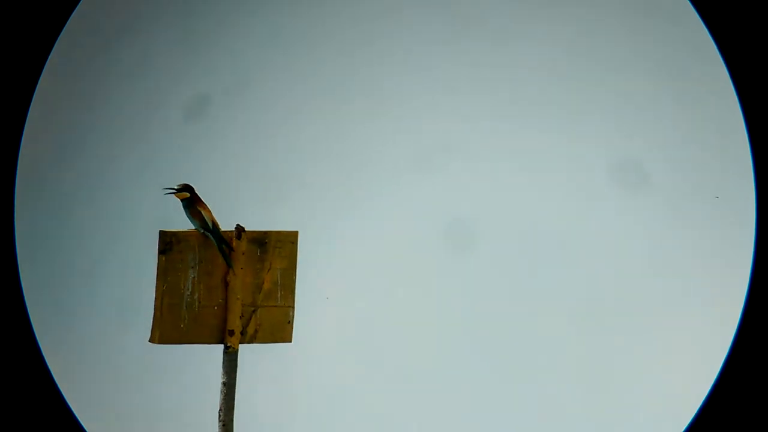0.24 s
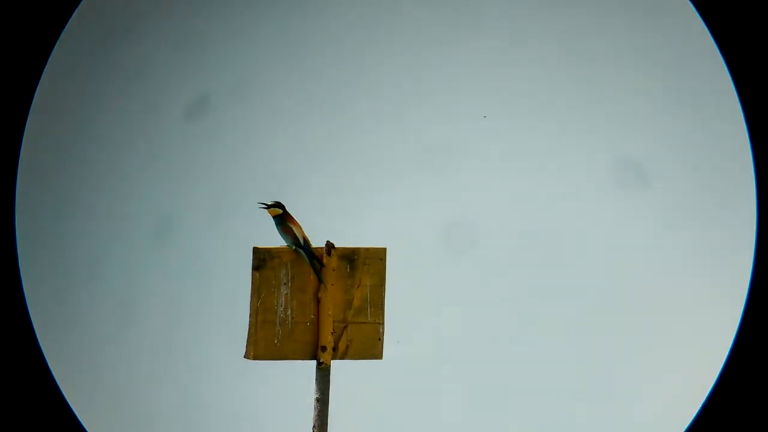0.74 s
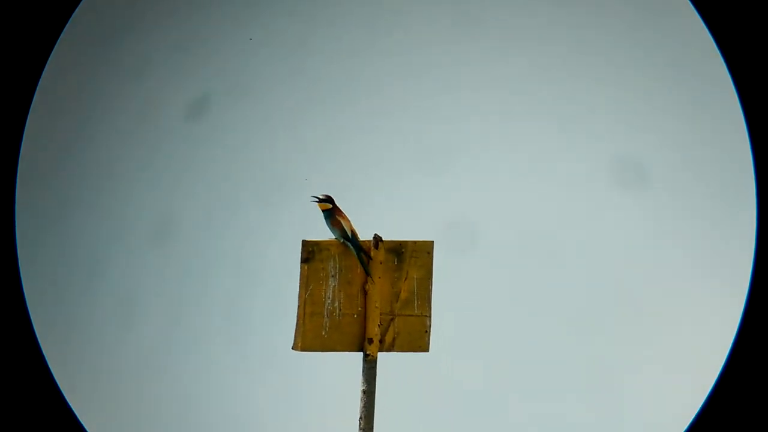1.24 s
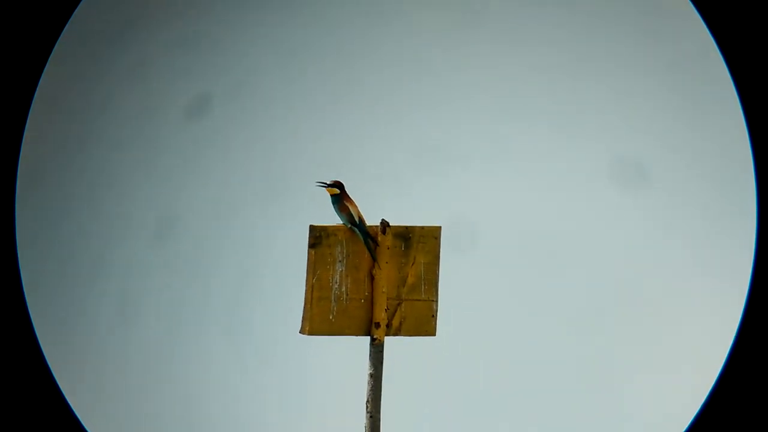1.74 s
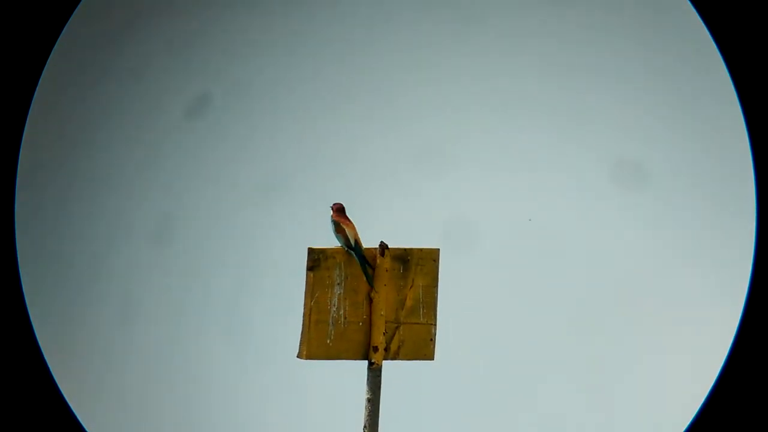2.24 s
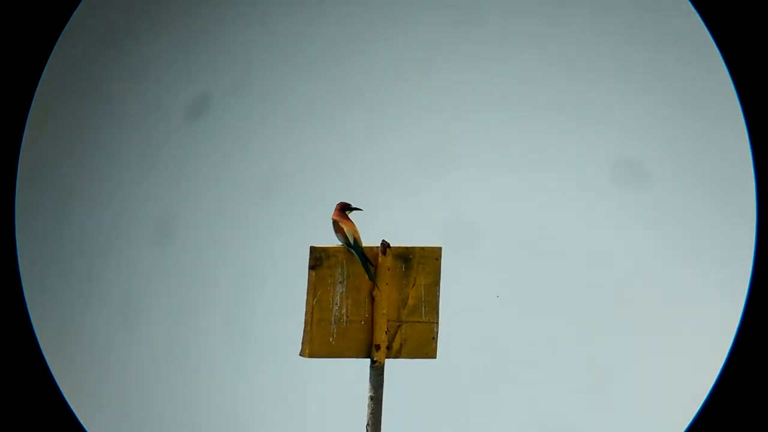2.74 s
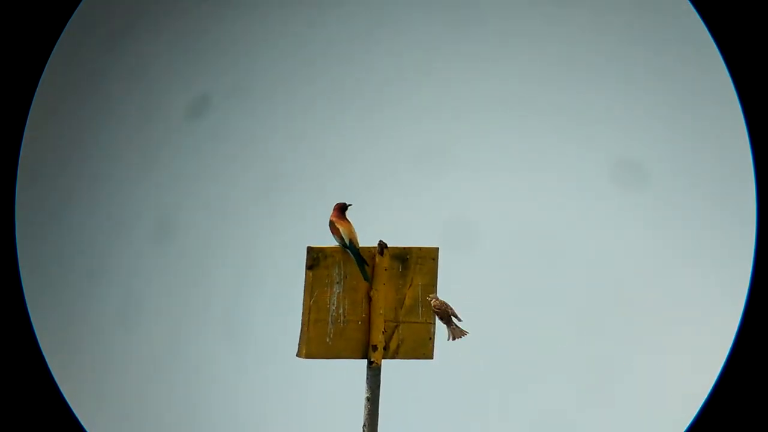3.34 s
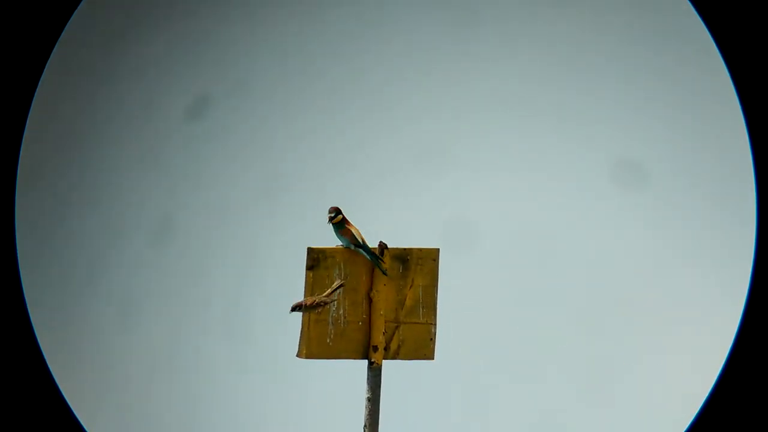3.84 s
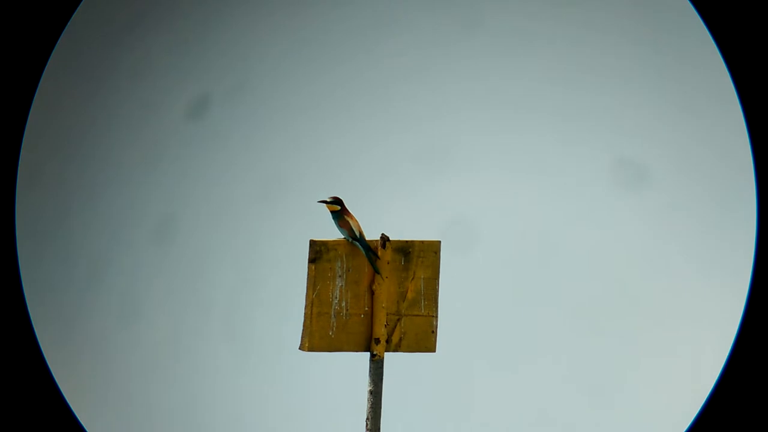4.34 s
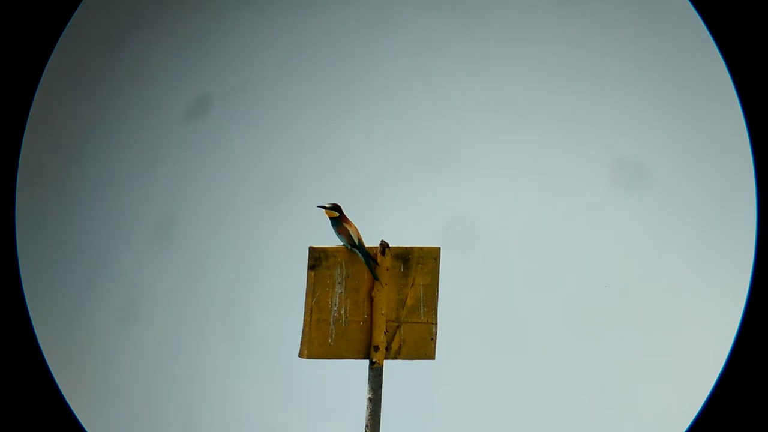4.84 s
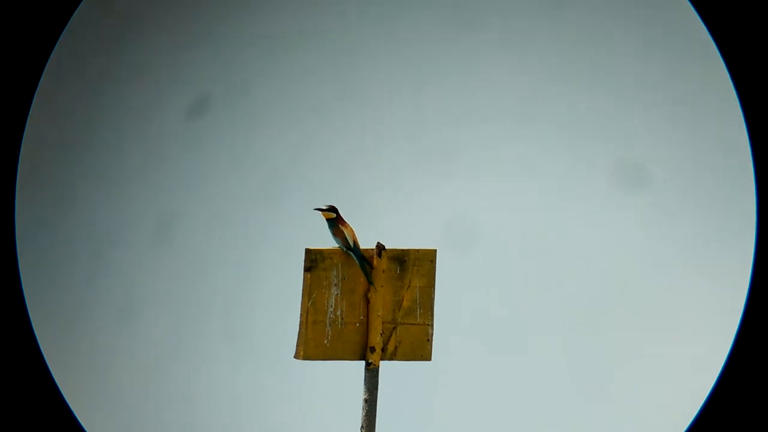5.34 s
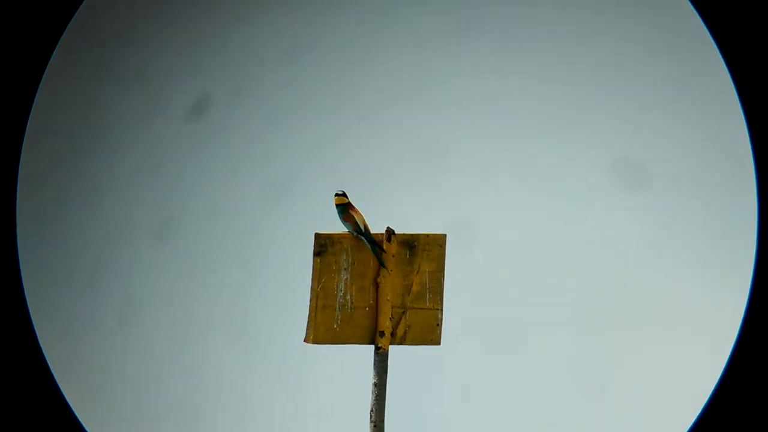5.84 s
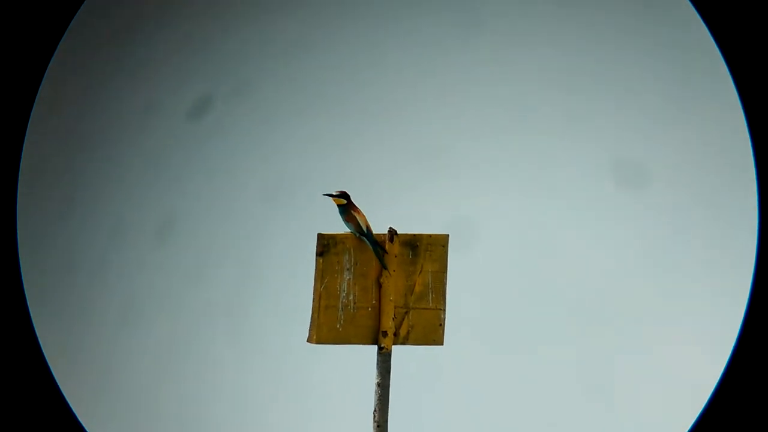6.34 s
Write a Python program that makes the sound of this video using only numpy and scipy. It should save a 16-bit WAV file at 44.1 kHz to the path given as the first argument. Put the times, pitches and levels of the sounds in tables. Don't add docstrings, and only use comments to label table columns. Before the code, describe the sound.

A small bird chirps short, bright, rasping notes in an open field while a distant one trills; handling knocks bump, one very loud near five seconds.

```python
import sys
import numpy as np
from scipy import signal
from scipy.io import wavfile
from scipy.ndimage import uniform_filter1d

SR = 44100
rng = np.random.default_rng(int(sys.argv[2]) if len(sys.argv) > 2 else 0)


def convert_level_to_amplitude(level_db):
    exponent = np.asarray(level_db, float) / 20
    return 10 ** exponent


def output_pcm(signal):
    pcm = np.clip(np.atleast_2d(signal).T, -1, 1) * 32767
    wavfile.write(sys.argv[1], SR, np.round(pcm).astype(np.int16))


N = 291114

# time in seconds, level in dB.
BREEZE = [
    (0, -68.5),
    (.9, -69),
    (1.9, -66.5),
    (2.8, -68),
    (4.1, -69),
    (5.2, -67.5),
    (6.0, -68),
    (6.6, -68),
]
# start and end in seconds, level in dB, left over right in dB.
GUSTS = [(.0, 0.31, -70, 6), (.38, 0.564, -64, 11), (0.599, 0.716, -67.5, -2), (0.835, 1.109, -67, 9),
         (1.185, 1.557, -70, 12), (1.632, 1.931, -62, 16), (2.447, 2.65, -65.5, 8), (2.731, 2.887, -61, 2),
         (2.905, 3.243, -59, 0), (3.216, 3.593, -60.5, -3), (3.604, 3.761, -65.5, 16),
         (3.985, 4.302, -60.5, -2.5), (4.694, 4.849, -69, 0), (5.059, 5.242, -59, 16),
         (5.276, 5.425, -61.5, 6), (5.5, 5.67, -61, 11), (5.848, 6.13, -60, 12.5)]
# start in seconds, level in dB, pitch in Hz, left over right in dB.
BUFFETS = [
    (2.785, -50, 65, -6),
    (2.852, -50, 60, -6),
    (2.953, -44, 60, -8),
    (3.108, -47, 60, -5),
    (3.166, -47, 65, -5),
    (3.247, -48, 55, -5),
    (3.476, -46, 48, -5),
    (3.507, -43, 65, -5),
]
CALM_DB, CALM_FOLLOWS, CALM_PAN_DB = -68.5, 1.5, 9

# pitch in Hz, level in dB per Hz.
HISS_SHAPE = [(75, -7.5), (199, -12.5), (800, -21), (2060, -23.5), (3580, -25.5), (4420, -22.5),
              (5310, -29), (16000, -31)]
HISS_DB, TREBLE_FOLLOWS, MIDDLE_FOLLOWS = -38, 0.81, 0.85

# start and end in seconds, level in dB.
GRIPS = [
    (.40, .6, -69),
    (.85, 1.45, -73.5),
    (1.45, 2.15, -75),
    (3.6, 4.2, -75.5),
    (4.25, 4.45, -67.5),
    (4.95, 5.2, -61.5),
    (5.22, 5.36, -50),
    (5.385, 5.47, -54),
    (5.5, 5.64, -59.5),
    (5.86, 6.3, -71),
]
RESTING_DB = -77.5

# start and end in seconds after the call starts, first and last pitch in Hz, level in dB.
HOOK = [
    (.008, .021, 3917, 5000, -9),
    (.020, .034, 5000, 5330, -0.5),
    (.034, .044, 4590, 3940, 0.5),
    (.044, .051, 4300, 4850, -6),
    (.051, .060, 4800, 4050, -7),
    (.061, .080, 3900, 4260, -4),
    (.082, .091, 3590, 3000, -15.5),
]
SLIDE = [
    (.014, .019, 4150, 4600, -6),
    (.019, .026, 4550, 4750, -1),
    (.025, .031, 4800, 5300, -6),
    (.031, .038, 4990, 4050, -6),
    (.040, .049, 4450, 3950, -4),
    (.049, .066, 4600, 3950, -1),
    (.068, .081, 3400, 3240, -12),
    (.086, .104, 3700, 4400, -7),
]
ARCH = [
    (.012, .023, 3960, 5500, -7),
    (.023, .029, 5540, 5290, -6),
    (.029, .039, 4940, 3900, -5.5),
    (.042, .068, 4350, 3940, -1.5),
    (.069, .081, 3000, 3450, -7),
    (.080, .089, 3450, 4150, -7),
]
# start in seconds, peak level in dB, pitch factor, left over right in dB.
HOOKS = [
    (0.029, -51, 0.982, -5.5),
    (0.936, -48, 0.993, -3.46),
    (1.2312, -48, 1.016, -2.9),
    (1.9234, -48, 1.02, -4.5),
    (2.8193, -54, 1.013, -2.5),
    (3.296, -54, 0.995, -3),
    (3.9797, -53.5, 1.006, -5),
    (4.6906, -51.5, 0.99, -3.5),
    (5.4942, -53, 1.016, -1.5),
]
SLIDES = [
    (0.386, -50, 1.0, -5.5),
    (0.7323, -50, 0.97, -8.5),
    (1.446, -48, 0.98, -4),
]
ARCHES = [
    (1.842, -44, 1.01, -6.5),
    (2.729, -51, 0.99, -3),
    (3.609, -52.5, 0.982, -1.5),
]
NOTE_EDGE_S = 0.0021
RASP_HZ, RASP_DEPTH, RASP_SWING = 210, .45, .017
ECHO_S, ECHO_DB = .014, -12

# start and end in seconds, first pitch in Hz, notes per second, level in dB.
EVEN_TRILLS = [
    (.61, .73, 4550, 60, -64),
    (1.558, 1.70, 3780, 58, -56.5),
    (2.026, 2.21, 4430, 59.5, -53.5),
    (3.229, 3.315, 4680, 59, -58),
    (3.3705, 3.52, 4390, 60, -51.5),
]
CLIMBING_TRILLS = [
    (2.52, 2.555, 2950, 70, -51),
    (4.989, 5.18, 3400, 47, -53),
]
RUN_UP = [
    (2.633, 2.765, 2920, 91, -48.5),
]
PIPS = [
    (4.5335, 4.812, 4750, 32.3, -50.5),
]
RUN_DOWN = [
    (3.005, 3.11, 3000, 96, -56),
]
# its phrases, drift in Hz per second, length of a note as a spread in seconds,
# fall within a note in Hz per second, cup (rise in Hz at 5 ms from the middle of a note).
TRILL_KINDS = [
    (EVEN_TRILLS, -500, .005, 4000, 230),
    (CLIMBING_TRILLS, 700, .0045, 25000, 0),
    (RUN_UP, 6300, .0011, 200000, 0),
    (RUN_DOWN, -4500, .002, 50000, 0),
    (PIPS, 0, .0016, 130000, 0),
    ([(3.70, 3.976, 4230, 53, -60.5)], -250, .0044, 6000, 0),
]
# start and end in seconds, first and last pitch in Hz, level in dB.
SLURS = [(0.12, 0.142, 3685, 4400, -60.5), (0.15, .168, 3800, 4400, -60), (.168, .185, 3900, 4550, -58),
         (.19, .205, 4150, 4300, -62), (.21, 0.24, 4230, 4260, -61), (0.236, 0.274, 4250, 3870, -62.5),
         (2.501, 2.517, 4840, 3550, -52), (3.11, 3.133, 3900, 4200, -59.5), (3.139, 3.146, 4250, 3850, -57),
         (3.152, 3.163, 3600, 3350, -57), (3.538, 3.55, 4000, 3600, -57), (2.918, 2.932, 4900, 4600, -60),
         (4.874, 4.896, 4770, 4200, -59), (4.919, 4.941, 4400, 4100, -57),
         (1.612, 1.624, 7000, 6880, -61.5), (0.937, 0.95, 5640, 6200, -56), (1.03, 1.066, 5130, 5300, -66),
         (1.096, 1.108, 5980, 6440, -64.5), (1.159, 1.177, 4000, 4230, -57),
         (1.196, 1.231, 3850, 5200, -60), (1.232, 1.246, 5700, 5900, -58), (1.741, 1.756, 5600, 5920, -57),
         (1.741, 1.759, 3500, 3790, -60.5), (2.0, 2.018, 5400, 5550, -60), (2.018, 2.05, 5300, 4800, -64),
         (2.052, 2.066, 3750, 3450, -63), (2.095, 2.11, 2950, 3050, -63), (1.8, 1.813, 4050, 3850, -60),
         (1.826, 1.832, 3600, 3300, -60), (1.836, 1.845, 3050, 3300, -59), (1.945, 1.957, 7500, 7300, -63),
         (2.007, 2.017, 3350, 3150, -57), (2.495, 2.503, 3700, 3900, -57), (4.135, 4.142, 4100, 3700, -57),
         (4.154, 4.161, 3400, 3050, -59), (6.508, 6.522, 3500, 4050, -62), (1.03, 1.036, 5300, 4950, -57),
         (1.064, 1.071, 5200, 4800, -56), (3.972, 4.012, 4170, 3750, -57), (4.242, 4.275, 5900, 5280, -64),
         (4.297, 4.32, 3930, 4124, -61.5)]
MORE_SLURS = [
    (1.11, 1.152, 5650, 5400, -57),
    (1.118, 1.136, 4600, 5200, -55.5),
    (1.372, 1.4, 5800, 4780, -56),
    (3.503, 3.522, 4900, 4820, -58),
    (3.52, 3.535, 4820, 4350, -55),
    (6.14, 6.2, 4500, 4400, -67),
    (6.196, 6.246, 4350, 3980, -65),
    (4.948, 4.958, 3600, 3400, -58),
]
FAR_WHISTLE = [
    (5.75, 5.77, 2480, 2500, -70),
    (5.775, 5.815, 2600, 2620, -69.5),
    (5.822, 5.885, 2690, 2650, -68),
    (5.905, 5.922, 2750, 2760, -65),
    (5.937, 5.958, 2830, 2780, -64),
    (6.0, 6.045, 2640, 2600, -73),
]
WARBLE = [
    (2.212, 2.45, 4230, 3950, -53.5),
]
SWINGS_PER_S = 24
LARK_PAN_DB, LARK_LAG_S = -11, 4 / SR
LARK_SHIMMER_DB, LARK_SCATTER_DB = 1.0, -16
FIELD_T60_S, SCATTER_DB = 0.12, -4

# start in seconds, level in dB, pitch in Hz, push +1 or pull -1.
KNOCKS = [(.438, -45.5, 402, 1), (.535, -48, 309, 1), (1.215, -44.5, 466, 1), (1.262, -44, 436, -1),
          (1.386, -49, 297, 1), (1.616, -44, 307.5, 1), (2.039, -45, 192.1, 1), (3.139, -44.5, 184.7, 1),
          (4.067, -42, 182, -1), (4.331, -48, 168, 1), (5.008, -43.5, 302, 1), (5.388, -39, 300, 1),
          (5.526, -37.5, 227, -1), (5.887, -40, 229, 1), (5.937, -36.5, 170, -1), (1.212, -45, 200, -1),
          (1.296, -46, 190, 1), (1.299, -44, 140, -1), (5.272, -40, 480, 1), (5.306, -42, 330, -1),
          (5.324, -41, 400, -1), (5.395, -41, 290, -1), (5.403, -43, 330, 1), (5.538, -39, 200, -1),
          (5.561, -43, 200, -1), (5.578, -45, 250, -1), (5.912, -43, 330, 1), (6.012, -48, 330, 1),
          (6.042, -44, 350, -1)]
SWELL_CYCLES = 0.383
# start in seconds, level in dB, pitch in Hz, swell in cycles, push +1 or pull -1.
BLOWS = [(.8743, -35, 187, .19, 1), (1.4892, -36.5, 251, .65, -1), (1.4893, -38.5, 141, .17, 1),
         (1.788, -30, 402, .29, 1), (1.7904, -36, 359, 1.07, -1), (1.7916, -27, 182, .41, -1),
         (1.8624, -26, 164, .32, 1), (1.8633, -16, 510, .37, -1), (1.8637, -28.5, 229, .73, 1),
         (5.1208, -13.6, 270, .19, -1), (5.1216, -.8, 405, .22, 1), (5.1259, -17, 269, .3, 1),
         (5.1338, -22.5, 227, .18, -1), (6.0563, -32, 203, .27, 1), (6.0583, -27.5, 361, .49, 1),
         (6.072, -36, 295, .45, 1), (6.0722, -32, 406, .85, -1), (5.05, -40, 384, 0.686, 1),
         (5.1395, -27, 450, .6, 1), (5.146, -29, 480, .5, 1), (5.9266, -38, 273, 1.06, 1),
         (5.926, -42, 142, .73, -1)]
# start in seconds, level in dB.
TICKS = [
    (1.7885, -33),
    (1.8647, -31),
    (5.1218, -16),
    (5.131, -26),
    (5.885, -61),
    (6.058, -57),
    (6.073, -55.5),
]
# pitch in Hz, level in dB, time to fade by 60 dB in seconds.
TICK_MODES = [(2070, -2.5, 0.0042), (3500, -4.5, 0.0034), (4400, -0.5, 0.0028), (5500, 6, 0.0017),
              (7000, -13, 0.005), (10000, -8.5, 0.0036), (12620, -15, .004)]
# start in seconds, level in dB, pitch in Hz, time to fade by 60 dB in seconds.
PINGS = [
    (1.7885, -28.5, 4330, 0.014),
    (5.1308, -25, 4400, .017),
    (1.7884, -42, 12500, .005),
    (1.7885, -39, 10300, .004),
    (1.8645, -39, 10400, .004),
    (1.788, -42, 1850, .008),
    (1.8646, -36, 2500, .004),
    (.404, -39, 566, 0.041),
    (1.293, -41, 550, .09),
]
HOUSING_CUT_HZ = 950
# start and end in seconds, lowest and highest Hz, level in dB.
STRAINS = [
    (1.755, 1.79, 4200, 4600, -45),
    (1.74, 1.79, 11800, 13200, -63),
    (1.75, 1.79, 9300, 10800, -66),
    (1.76, 1.79, 6400, 7400, -64),
    (5.07, 5.122, 4200, 4700, -53),
]

# start and end in seconds, lowest and highest Hz, level in dB.
SCRAPES = [
    (5.13, 5.16, 1510, 7100, -50.5),
    (5.131, 5.18, 203, 880, -43.5),
    (5.262, 5.302, 1490, 7730, -59.5),
    (5.462, 5.467, 1000, 5920, -60),
    (5.89, 5.974, 202, 620, -54),
]
CHATTER = [(5.882, 5.963, 2010, 4000, -63.5), (5.885, 5.96, 4000, 8000, -69),
           (6.043, 6.078, 1130, 4000, -64.5), (6.19, 6.39, 9300, 10800, -74.5),
           (6.2, 6.42, 10600, 13200, -79), (6.197, 6.4, 4640, 6900, -76), (5.97, 6.24, 4650, 5300, -72),
           (6.17, 6.36, 4550, 5200, -71.5), (6.28, 6.5, 4500, 5200, -72), (6.42, 6.6, 4800, 5400, -70),
           (0.916, 1.44, 4400, 5830, -74)]
SCRAPE_PAN_DB, CHATTER_PAN_DB = 21, -3.5

# start of sinking and moment of opening, in seconds.
GATE = [
    (-.25, .035),
    (.2, .395),
    (.68, .87),
    (2.05, 2.478),
    (2.4, 2.745),
    (3.72, 3.99),
    (4.25, 4.70),
    (4.68, 5.0),
    (5.64, 5.875),
    (6.28, 6.7),
]
SINK_DB_PER_S, OPEN_S = 14.5, 0.014


def rms_one(x):
    return x / np.sqrt(np.mean(x ** 2) + 1e-20)


def in_time(rows):
    s, *columns = np.transpose(rows)
    return [np.interp(np.arange(N) / SR, s, c) for c in columns]


def drift(rate):
    r = np.exp(-2 * np.pi * rate * 40 / SR)
    slow = signal.lfilter([1], [1, -2 * r, r * r], rng.standard_normal(N // 40 + 2002))[2000:]
    return np.interp(np.arange(N) / 40, np.arange(len(slow)), rms_one(slow))


def band(x, low_hz, high_hz, order=2):
    return signal.sosfilt(signal.butter(order, [low_hz, high_hz], "band", fs=SR, output="sos"), x)


def ring(clicks, hz, t60):
    r, w = convert_level_to_amplitude(-60 / (t60 * SR)), 2 * np.pi * hz / SR
    return signal.lfilter([0, np.sin(w)], [1, -2 * r * np.cos(w), r * r], clicks + 1e-18)


def add(out, start, sound, pan_db, lag=0.):
    for channel, at in enumerate((start, start + lag)):
        i = round(at * SR)
        out[channel, i:i + len(sound)] += sound[:N - i] * convert_level_to_amplitude(pan_db * (1.5 - channel))


def whistle(hz, gain):
    return gain * np.sin(2 * np.pi * np.cumsum(hz) / SR)


def fade(t, length, edge):
    return np.clip(np.minimum(t, length - t) / edge, 0, 1)


def swells(rows, edge):
    t = np.arange(N) / SR
    return [convert_level_to_amplitude(level_db) * fade(t - start, end - start, edge * (end - start))
            for start, end, level_db, *_ in rows]


def breeze():
    level_db, = in_time(BREEZE)
    return level_db - level_db.mean()


def wind():
    side = np.array([[.4], [-.4]])
    force = convert_level_to_amplitude(CALM_DB + CALM_FOLLOWS * breeze() + CALM_PAN_DB * side)
    for gust, (*_, pan_db) in zip(swells(GUSTS, edge=0.205), GUSTS):
        force = force + gust * convert_level_to_amplitude(pan_db * side)
    lumps = convert_level_to_amplitude(np.stack([2.6 * drift(21), 2.2 * drift(6.48)]))
    own, shared = rng.standard_normal((2, N)), rng.standard_normal(N)
    rumble = rms_one(band(own + 0.62 * shared, 31.8, 92) * lumps)
    hum = rms_one(band(rng.standard_normal(N), 58, 61))
    out = rumble * force * convert_level_to_amplitude([[-.4], [1.4]]) + convert_level_to_amplitude(-69.5) * hum
    for start, level_db, hz, pan_db in BUFFETS:
        t = np.arange(0, 1.5 / hz, 1 / SR)
        bulge = np.sin(np.pi * t * hz / 1.5) ** 2
        add(out, start, whistle(hz + 0 * t, convert_level_to_amplitude(level_db) * bulge), pan_db)
    return out


def hiss():
    out, edges, white = 0, 90 * 2 ** np.arange(0, 8, .5), rng.standard_normal((2, 2, N))
    edges[-1] = 17500
    air_db, breath = breeze(), drift(6.0)
    shape_hz, shape_level_db = np.transpose(HISS_SHAPE)
    for k, (low, high) in enumerate(zip(edges, edges[1:])):
        hz = np.sqrt(low * high)
        shape_db = np.interp(np.log(hz), np.log(shape_hz), shape_level_db)
        level_db = HISS_DB + (TREBLE_FOLLOWS * air_db if hz > 4000 else MIDDLE_FOLLOWS * air_db + 1.5)
        gain = convert_level_to_amplitude(shape_db + level_db + 0.51 * breath + 0.65 * drift(8.1))
        out = out + gain * band(white[k % 2], low, high)
    return out


def creak():
    grip = convert_level_to_amplitude(RESTING_DB + breeze()) + sum(swells(GRIPS, edge=0.25))
    happens = rng.random(N) < 1100 / SR
    slips = happens * convert_level_to_amplitude(2.6 * np.minimum(rng.exponential(1, N), 4)) * rng.choice([-1, 1], N)
    pitches, dealt = np.geomspace(150, 700, 10), rng.integers(0, 10, N)
    rings = sum(ring(slips * (dealt == k), hz, 3.2 / hz) for k, hz in enumerate(pitches))
    return grip * convert_level_to_amplitude(2.5) * rms_one(band(rings, 100, 750, order=3))


def chirps():
    out, flutter, waver = np.zeros((2, N)), drift(97), drift(76.5)
    throb = whistle(RASP_HZ * (1 + .25 * drift(29.6)), 0.88)
    for shape, calls in ((HOOK, HOOKS), (SLIDE, SLIDES), (ARCH, ARCHES)):
        t = np.arange(shape[0][0], shape[-1][1], 1 / SR)
        points = []
        for a, b, first_hz, last_hz, _ in shape:
            points += [(a + 0.0014, first_hz), (b - .001, last_hz)]
        s, hz = np.transpose(points)
        track = uniform_filter1d(np.interp(t, np.sort(s), hz), size=60)
        gain = np.max([convert_level_to_amplitude(db) * fade(t - a, b - a, NOTE_EDGE_S) for a, b, *_, db in shape], axis=0)
        for start, peak_db, factor, pan_db in calls:
            span = round(start * SR) + np.arange(len(t))
            pitch = track * factor * (1 + 0.014 * waver[span] + RASP_SWING * throb[span])
            loudness = gain * (1 + RASP_DEPTH * throb[span]) * convert_level_to_amplitude(peak_db + 3.07 * flutter[span])
            add(out, start + t[0], whistle(pitch, loudness), pan_db, lag=-1 / SR)
    return out + convert_level_to_amplitude(ECHO_DB) * np.roll(out, round(ECHO_S * SR), axis=1)


def lark():
    out = np.zeros((2, N))
    for phrases, drift_rate, spread, fall, cup_hz in TRILL_KINDS:
        for start, end, first_hz, rate, level_db in phrases:
            t = np.arange(0, end - start, 1 / SR)
            off_centre = (t * rate % 1 - .5) / rate
            pitch = first_hz + drift_rate * t - fall * off_centre + cup_hz * (off_centre / .005) ** 2
            note = np.exp(-.5 * (off_centre / spread) ** 2)
            gain = convert_level_to_amplitude(level_db) * note * fade(t, end - start, 0.003)
            add(out, start, whistle(pitch, gain), LARK_PAN_DB, LARK_LAG_S)
    for rows, pan_db in ((SLURS + MORE_SLURS, -6.5), (FAR_WHISTLE, 0)):
        for start, end, first_hz, last_hz, level_db in rows:
            t = np.arange(0, end - start, 1 / SR)
            gain = convert_level_to_amplitude(level_db) * fade(t, end - start, 0.0038)
            add(out, start, whistle(np.linspace(first_hz, last_hz, len(t)), gain), pan_db, LARK_LAG_S)
    for start, end, first_hz, last_hz, level_db in WARBLE:
        t = np.arange(0, end - start, 1 / SR)
        swing = np.tanh(1.7 * np.sin(2 * np.pi * SWINGS_PER_S * t + 0.17))
        pitch = np.linspace(first_hz, last_hz, len(t)) + 520 * swing
        rest = np.clip(np.sin(np.pi * (SWINGS_PER_S * t % 1)) / 0.41, 0, 1)
        gain = convert_level_to_amplitude(level_db) * rest * (1 + .3 * swing) * fade(t, end - start, 0.0084)
        add(out, start, whistle(pitch, gain), LARK_PAN_DB, LARK_LAG_S)
    return out * convert_level_to_amplitude(LARK_SHIMMER_DB * drift(25))


def field(x, scatter_db):
    t = np.arange(SR // 6) / SR
    sparse = rng.standard_normal((2, len(t))) * (rng.random((2, len(t))) < .03)
    tail = sparse * convert_level_to_amplitude(-60 * t / FIELD_T60_S)
    tail = convert_level_to_amplitude(scatter_db) * tail / np.linalg.norm(tail, axis=1, keepdims=True)
    return x + signal.fftconvolve(x, tail, axes=1)[:, :N]


def knocks():
    left, click, t = np.zeros((2, N)), np.eye(1, SR // 8)[0], np.arange(SR // 8) / SR
    dull = signal.butter(4, HOUSING_CUT_HZ, fs=SR, output="sos")
    soft = [(start, db, hz, SWELL_CYCLES, direction) for start, db, hz, direction in KNOCKS]
    for start, thump_db, hz, cycles, direction in BLOWS + soft:
        swell = cycles / hz
        pitch = hz * (1.28 * np.exp(-t / (8 * swell))) ** min(1, 1.2 / cycles)
        thump = whistle(pitch, (t / swell) ** 2 * np.exp(-t / swell))
        thump = signal.sosfilt(dull, band(thump, 100, 1400))
        add(left, start, np.sign(direction) * convert_level_to_amplitude(thump_db) * thump / np.max(np.abs(thump)), 0)
    chances_db = rng.normal(0, 0.71, (len(TICKS), len(TICK_MODES)))
    for (start, tick_db), chance_db in zip(TICKS, chances_db):
        tick = sum(convert_level_to_amplitude(db + c) * ring(click, hz, t60) for (hz, db, t60), c in zip(TICK_MODES, chance_db))
        add(left, start, convert_level_to_amplitude(tick_db - 6.5) * band(tick, 2000, 13800), 0)
    for start, level_db, hz, t60 in PINGS:
        add(left, start, convert_level_to_amplitude(level_db) * ring(click, hz, t60), 0)
    return left[0]


def strains():
    out, white = np.zeros(N), rng.standard_normal(N) * convert_level_to_amplitude(3.0 * drift(150))
    for start, end, low_hz, high_hz, level_db in STRAINS:
        span = slice(round(start * SR), round(end * SR))
        noise = rms_one(band(white[span], low_hz, high_hz))
        out[span] += convert_level_to_amplitude(level_db) * noise * np.linspace(0, 1, len(noise)) ** 1.08
    return out


def housing():
    left = knocks() + creak() + strains()
    return np.stack([left, convert_level_to_amplitude(-35.5) * np.roll(left, shift=35)])


def rustles():
    out, white, grain = np.zeros((2, N)), rng.standard_normal((2, N)), convert_level_to_amplitude(2.3 * drift(120))
    for rows, pan_db in ((SCRAPES, SCRAPE_PAN_DB), (CHATTER, CHATTER_PAN_DB)):
        for start, end, low_hz, high_hz, level_db in rows:
            span = slice(round(start * SR), round(end * SR))
            noise = rms_one(band(white[:, span], low_hz, high_hz, order=3)) * grain[span]
            t = np.arange(noise.shape[1]) / SR
            envelope = fade(t, end - start, 0.27 * (end - start))
            out[:, span] += noise * envelope * convert_level_to_amplitude(level_db - np.array([[0], [pan_db]]))
    return out


def gate():
    t = np.arange(N) / SR
    losses_db = [SINK_DB_PER_S * np.clip(t - start, 0, None) * (t < end) for start, end in GATE]
    return convert_level_to_amplitude(-uniform_filter1d(np.max(losses_db, axis=0), size=round(OPEN_S * SR)))


def scene():
    birds = field(chirps(), SCATTER_DB) + field(lark(), LARK_SCATTER_DB)
    return birds + housing() + rustles() + wind() + hiss()


def top_cut(x):
    return signal.sosfilt(signal.butter(12, 16470, fs=SR, output="sos"), x)


def record(dry):
    cut = signal.sosfilt(signal.cheby2(20, 60, 15950, fs=SR, output="sos"), dry)
    return top_cut(cut * gate() - .0004)


dry = scene()
out = record(dry)
output_pcm(out)
```